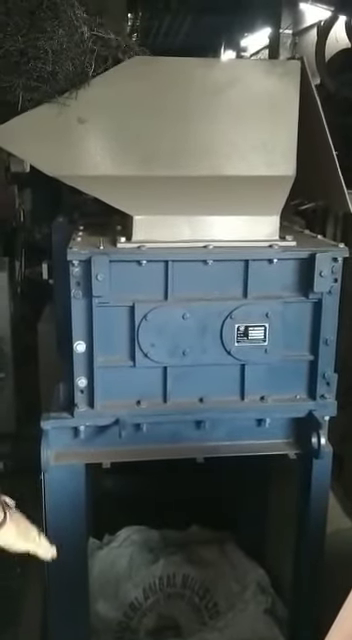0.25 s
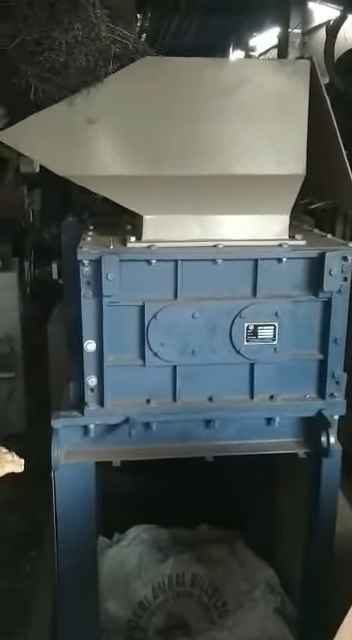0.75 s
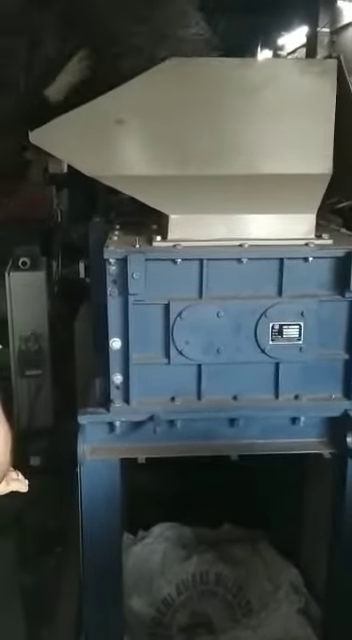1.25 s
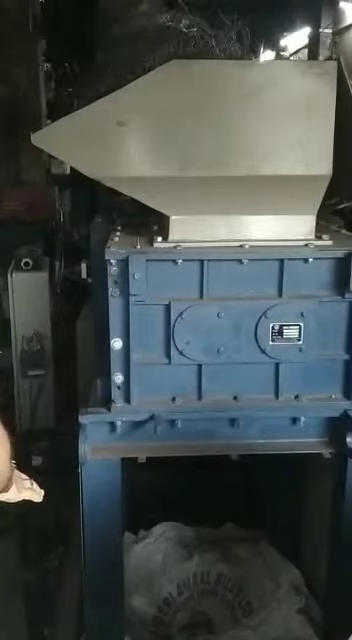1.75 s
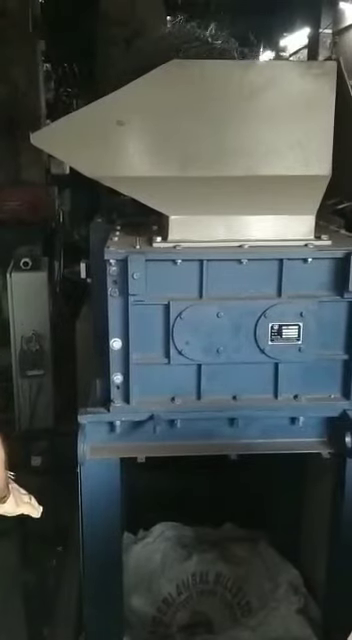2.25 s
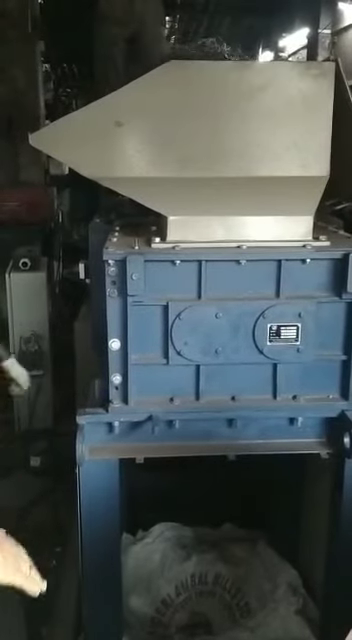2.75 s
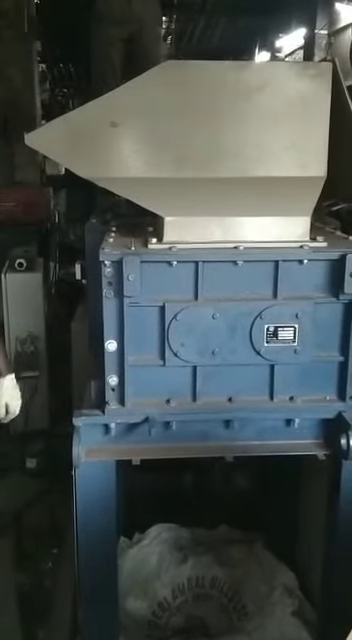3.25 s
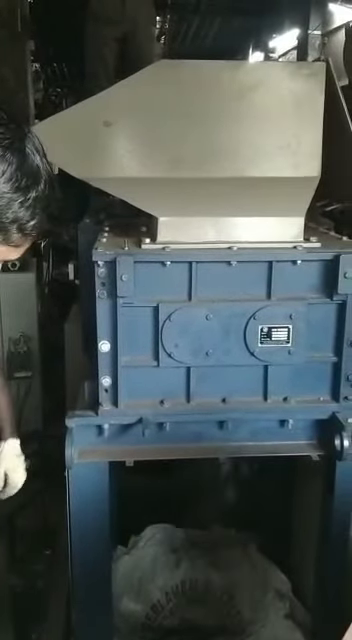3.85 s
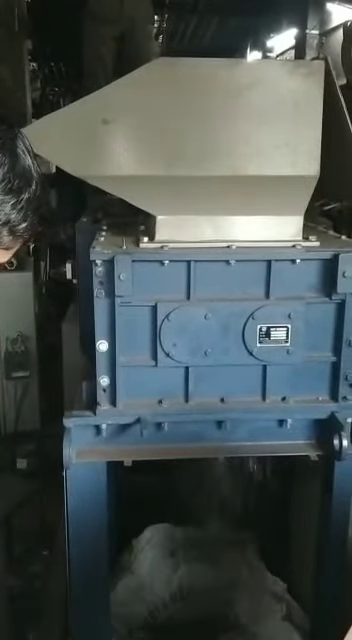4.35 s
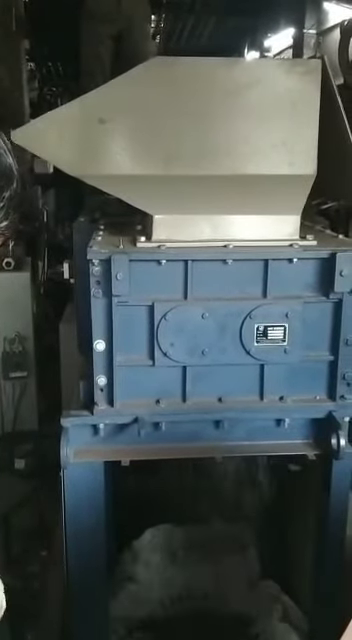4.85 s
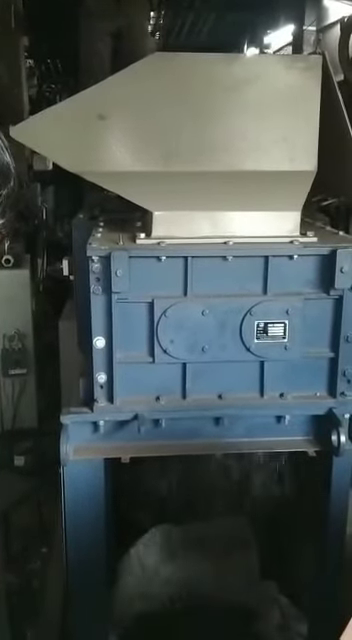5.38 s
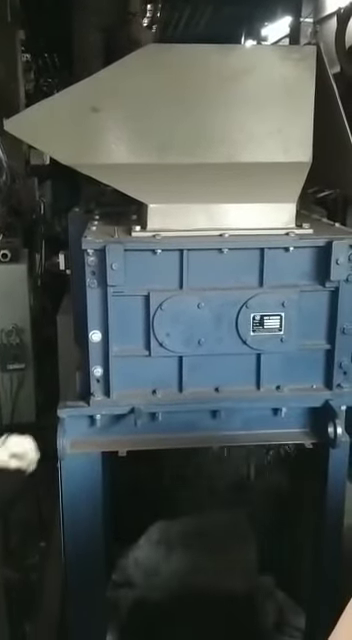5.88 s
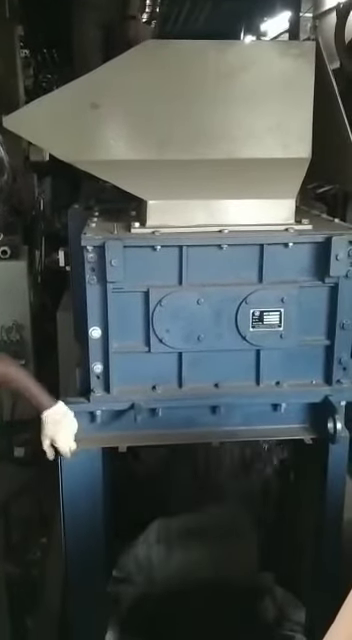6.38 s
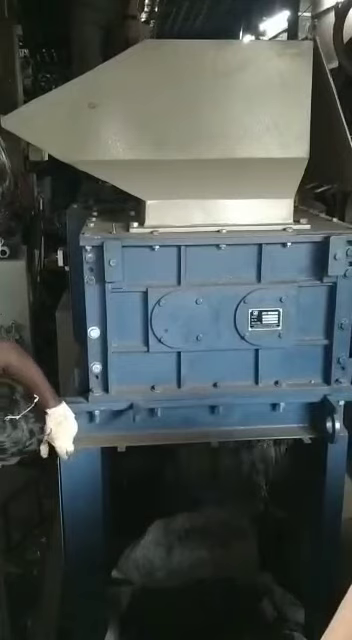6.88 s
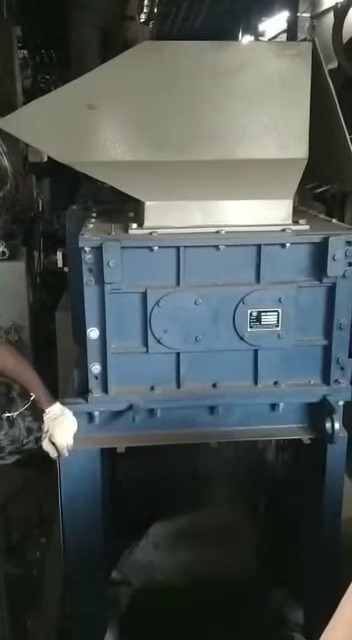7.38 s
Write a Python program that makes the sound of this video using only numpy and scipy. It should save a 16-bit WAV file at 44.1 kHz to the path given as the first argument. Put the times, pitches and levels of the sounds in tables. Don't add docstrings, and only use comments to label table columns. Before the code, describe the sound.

Close steady grinding and droning of a shredding machine, metal scraps rustling and knocking, while further off metal scrapes, clanks twice and squeals.

```python
import sys
import numpy as np
from scipy import signal
from scipy.io import wavfile
from scipy.ndimage import uniform_filter1d

SR = 44100
rng = np.random.default_rng(int(sys.argv[2]) if len(sys.argv) > 2 else 0)


def int16_out(signal):
    q = np.round(np.clip(np.atleast_2d(signal).T, -1, 1) * 32767)
    wavfile.write(sys.argv[1], SR, q.astype(np.int16))


def natural_amplitude(level_db):
    exponent = np.asarray(level_db, float) / 20
    return 10 ** exponent


N = 336042
T = np.arange(N) / SR


def evened(x):
    return x / np.sqrt(np.mean(x ** 2) + 1e-20)


def read(points, hz):
    f, value = np.transpose(points)
    return np.interp(np.log(hz + 1), np.log(f + 1), value)


def column(rows, index):
    rows = np.array(rows)
    return natural_amplitude(np.interp(T, rows[:, 0], rows[:, index]))


def resonate(x, hz, width, steady=0.):
    turn = np.exp(2j * np.pi * np.cumsum(hz * np.ones(len(x))) / SR)
    r = np.exp(-np.pi * width / SR)
    slow = signal.lfilter([1], [1, -2 * r, r * r], x / turn)
    return (turn * slow / (abs(slow) + 1e-9) ** steady).real


def wander(per_s):
    hz = np.geomspace(per_s / 6, per_s, 16)[:, None]
    phase = hz * T[::256] + rng.random((16, 1))
    coarse = np.sin(2 * np.pi * phase).sum(0)
    return evened(np.interp(T, T[::256], coarse))


def chatter(colour, per_s, spread_db, patchy_db, flicker_db):
    size = natural_amplitude(spread_db * np.minimum(rng.exponential(1, N), 4))
    contacts = size * rng.standard_normal(N) * (rng.random(N) < per_s / SR)
    hz, t, z = signal.stft(contacts, SR, nperseg=1024, noverlap=768)
    patches = rng.standard_normal((len(t), len(hz))).T
    patches = uniform_filter1d(patches, size=10, axis=0)
    patches = evened(uniform_filter1d(patches, size=24, axis=1))
    gain_db = read(colour, hz)[:, None] + patchy_db * patches
    sound = signal.istft(z * natural_amplitude(gain_db), SR, nperseg=1024, noverlap=768)[1][:N]
    return evened(sound * natural_amplitude(flicker_db * wander(14.)))


def spell(t, start, end, soft):
    return np.clip(np.minimum(t - start, end - t) / soft + .5, 0, 1) ** 1.5


def whistles(rows, soft, steady):
    rub, out = rng.standard_normal(N), np.zeros(N)
    for first, last, width, start, end, db in rows:
        early = max(round((start - soft - .1) * SR), 0)
        span = slice(early, round((end + soft) * SR))
        hz = np.interp(T[span], [start, end], [first, last])
        tone = resonate(rub[span], hz, width, steady)
        out[span] += natural_amplitude(db) * spell(T[span], start, end, soft) * evened(tone)
    return out


def struck(t, hz, level_db, rise_s):
    return np.sqrt(2) * natural_amplitude(level_db) * (1 - np.exp(-t / rise_s)) * np.sin(2 * np.pi * hz * t)


# (time [s], load [dB])
CUTTER_LOAD = [(0, -4), (.4, -0.5), (1.1, -1.5), (1.8, -0.5), (2.2, -3), (2.8, -2), (3.3, 0.5), (4.3, 1.5),
               (5.2, 0.5), (6.0, 1.5), (6.6, .5), (7.1, 1.5), (7.62, 0)]


def load():
    return column(CUTTER_LOAD, index=1)


# (time [s], rumble rise [dB])
SHAFT_STRAINS = [(.1, 0), (1.35, 2), (1.95, 1), (2.2, 1.5), (3.0, 2.5), (3.75, -0.5), (4.75, 0.5),
                 (5.45, 1.5), (6.2, 0.5), (6.7, 2), (7.45, 3)]


def surges():
    t, hump_s = T[::64], 0.15
    up_db = sum(db * np.exp(-((t - s) / hump_s) ** 2) for s, db in SHAFT_STRAINS)
    return natural_amplitude(np.interp(T, t, up_db))


def throb(tops):
    t = T[::64]
    rise, fall, rest_db = 54, 54, -47.5
    swells = [db - np.maximum((s - t) * rise, (t - s) * fall) for s, db in tops]
    return natural_amplitude(np.interp(T, t, np.maximum(np.max(swells, axis=0), rest_db)))


# (time [s], grinding rise [dB], rustle rise [dB], gear whirr rise [dB])
WAD_BITES = [(.57, 0.5, -1, 0.5), (1.21, 1.5, 1.5, 2.5), (1.38, 0.5, 2, 1), (1.52, 1.5, 3.5, 0),
             (1.6, 0, -0.5, 1.5), (1.72, 2.5, 5, -0.5), (1.99, 0, 0, 1), (2.78, 0, -1.5, 1),
             (3.22, 1.5, 0.2, -1.5), (3.36, 0, -1, 0.5), (3.5, 0, -0.5, 1.5), (4.16, -1.5, 0.5, 2.5),
             (4.5, -1, 0.5, -0.5), (4.68, -1.5, 1.5, -0.5), (5.26, 0.5, 1, 0.5), (5.62, 1, 0, -0.5),
             (5.8, 1.5, -1, -2), (6.05, 0, -0.5, 0.5), (6.9, 1, 0.5, -0.5), (7.1, -0.5, 1, -1.5)]


def bites(index):
    t, rise_s, fall_s = T[::64], 0.042, 0.077
    up_db = 0
    for row in WAD_BITES:
        hump_s = np.where(t < row[0], rise_s, fall_s)
        up_db = up_db + row[index] * np.exp(-((t - row[0]) / hump_s) ** 2)
    return natural_amplitude(np.interp(T, t, up_db))


# (frequency [Hz], level [dB per Hz])
DRONE_COLOUR = [(20, -37), (40, -43), (65, -38.5), (95, 1), (230, -10), (280, -1), (400, 1), (560, -10),
                (900, -54)]
# (frequency [Hz], level [dB per Hz])
WHIRR_COLOUR = [(300, -32), (550, 1), (800, 2), (1000, 2), (1250, -2), (2000, -44)]
# (frequency [Hz], width [Hz], rms against the drone [dB])
HOUSING_PANELS = [(126.4, 7.1, -18.5), (141.4, 10.5, -15), (155.5, 10.6, -18.5), (191.2, 17, -14.5),
                  (217.2, 6.1, -16.5), (267.3, 9.8, -10.5), (307.3, 12, -7.5), (349.3, 22.5, -9.5),
                  (420.8, 24, -14), (485.7, 18, -12.5), (527, 23, -19)]
# (frequency [Hz], width [Hz])
LOUD_PANELS = [(289, 9.5), (323, 11.5)]
# (time [s], rms at the top [dB])
PANEL_THROBS = [
    [(.57, -38.5), (1.21, -35), (1.62, -35), (1.95, -37), (2.2, -35.5), (2.46, -35), (2.9, -47),
     (3.76, -41.5), (4.16, -39), (4.72, -35), (5.26, -42), (5.52, -34.5), (5.84, -35), (6.64, -37),
     (7.0, -36.5), (7.24, -41)],
    [(.68, -42), (1.15, -44), (1.35, -36), (1.59, -36), (2.0, -48), (2.8, -48), (3.8, -49), (4.27, -41.5),
     (5.5, -47), (5.95, -37), (6.64, -49), (6.98, -38.5), (7.6, -40)],
]


def housing():
    shake, work = rng.standard_normal(N), load()
    panels = np.zeros(N)
    for hz, width, db in HOUSING_PANELS:
        panels += natural_amplitude(db + 1.24 * wander(1.474)) * evened(resonate(shake, hz, width))
    drone = chatter(DRONE_COLOUR, 20000., spread_db=0.5, patchy_db=-1.0, flicker_db=1.0)
    rumble = surges() * evened(natural_amplitude(-3.5) * drone + panels)
    strong = np.zeros(N)
    for tops, (hz, width) in zip(PANEL_THROBS, LOUD_PANELS):
        strong += throb(tops) * evened(resonate(shake, hz, width, steady=0.55))
    whirr = chatter(WHIRR_COLOUR, 20000., spread_db=0.9, patchy_db=.6, flicker_db=0.2)
    whirr = bites(index=3) * whirr
    return natural_amplitude(-36.5) * work ** 0.092 * rumble + strong + natural_amplitude(-39) * work ** 0.21 * whirr


# (time [s], frequency [Hz], rms [dB])
MESH_WHINE = [(0, 986, -47), (.4, 986, -47.5), (.95, 1008, -47.5), (1.08, 990, -51), (1.2, 950, -58),
              (1.35, 922, -50), (1.8, 920, -51), (2.3, 915, -60), (4.8, 920, -66), (5.3, 925, -54),
              (5.8, 938, -62), (6.1, 950, -50), (6.6, 962, -50), (6.75, 975, -54), (7.0, 988, -48),
              (7.62, 1004, -47)]


def mesh():
    s, hz, _ = np.transpose(MESH_WHINE)
    whine = resonate(rng.standard_normal(N), np.interp(T, s, hz), 6., steady=.75)
    return column(MESH_WHINE, index=2) * evened(whine)


# (time [s], rms [dB])
MOTOR_HUM = [(0.0, -45), (0.2, -55), (0.42, -45), (0.7, -64), (0.88, -46.5), (1.4, -51.5), (2.0, -54),
             (2.4, -48), (2.9, -58), (3.65, -49.5), (3.9, -49), (4.37, -40.5), (5.26, -45), (5.69, -41.5),
             (6.11, -45), (6.9, -40.5), (7.45, -50), (7.62, -40)]
# (first frequency [Hz], last frequency [Hz], start [s], end [s], rms [dB])
BEARING_WHINES = [(920, 920, -.2, 1.1, -53), (190, 190, -.2, 1.7, -49), (2090, 2090, -.2, 1.3, -52),
                  (8450, 8450, -.2, 1.2, -57), (8450, 8450, 1.3, 2.1, -60), (1480, 1480, 3.9, 5.3, -50),
                  (1600, 1600, 3.7, 5.5, -50), (8450, 8450, 5.2, 6, -58), (8450, 8450, 6.1, 6.9, -61),
                  (8450, 8450, 7, 7.7, -58)]


def motor():
    hum_hz = 99.4
    hum = np.sqrt(2) * np.sin(2 * np.pi * hum_hz * T + 0.51 * wander(2.2))
    whines = []
    for first, last, *rest in BEARING_WHINES:
        width = min(0.019 * first, 25)
        whines.append((first, last, width, *rest))
    return column(MOTOR_HUM, index=1) * hum + mesh() + whistles(whines, .15, steady=.6)


# (frequency [Hz], level [dB per Hz])
GRIND_COLOUR = [(800, -25), (1250, -4.5), (1550, 0), (2200, 0), (3000, -3), (3300, -8.5), (5000, -45)]
# (frequency [Hz], level [dB per Hz])
RUSTLE_COLOUR = [(2000, -22), (3200, 0), (4500, -0.5), (5500, -2), (6400, -0.5), (7000, 1.5), (7700, -1),
                 (8300, -10), (9000, -18), (9650, -25), (10600, -31.5)]
# (time [s], stir [dB])
HOPPER_STIR = [(0, -1), (.15, 2.5), (.35, -2), (.68, 0.5), (1.2, -2.5), (1.85, -1.5), (2.2, -4.5),
               (2.8, -1.5), (3.3, 0.5), (4.3, -1), (4.8, -1), (5.3, 0.5), (5.9, 2.5), (6.42, 2),
               (6.6, -0.5), (7.62, 1)]
# (frequency [Hz], width [Hz], start [s],
# end [s], rms [dB])
WALL_BRUSHES = [
    (6980, 1800, 1.65, 1.786, -36),
    (5180, 570, 0.4, 1.19, -45.5),
    (7460, 340, 1.3, 1.55, -42.5),
    (2220, 1400, 3.24, 3.45, -40),
    (1520, 410, 2.6, 5.6, -43.5),
    (1430, 1800, 1.2, 1.6, -44),
    (6300, 460, 3.3, 4.3, -50),
    (4920, 720, 6.8, 7.5, -45.5),
    (632, 60, 1.51, 2.3, -46.5),
    (715, 70, 2.6, 3.15, -47),
]


def cutters():
    grind = chatter(GRIND_COLOUR, 20000., spread_db=.6, patchy_db=.5, flicker_db=.2)
    rustle = chatter(RUSTLE_COLOUR, 30000., spread_db=.7, patchy_db=.9, flicker_db=.55)
    brushes = whistles([(hz, hz, *rest) for hz, *rest in WALL_BRUSHES], .05, steady=0)
    grind = natural_amplitude(-34) * load() * bites(index=1) * grind
    rustle = natural_amplitude(-34) * column(HOPPER_STIR, index=1) * bites(index=2) * rustle
    return grind + rustle + brushes


# (frequency [Hz], width [Hz], rms [dB])
SHEET_MODES = [(2035, 60, -43), (2220, 40, -47), (2710, 110, -44), (2960, 40, -48), (3900, 130, -43),
               (4100, 180, -43.5), (4710, 60, -49), (5795, 200, -46), (6560, 220, -43), (7130, 60, -48),
               (8000, 220, -46)]
# (time [s], pressure [dB])
SHEET_SCRAPE = [
    (0, -1),
    (.1, -3),
    (.2, -3),
    (.27, 3),
    (.295, -3),
    (.34, -24),
]
# (frequency [Hz], start [s], end [s], rms [dB])
SHEET_CRIES = [(5800, .11, .23, -39.5), (5800, .23, .29, -44), (3950, .04, .22, -42), (4060, .07, .13, -42),
               (4060, .17, .22, -42), (4010, .235, .265, -38.5), (2740, .17, .22, -39),
               (2500, .03, .1, -44), (2500, .24, .29, -42), (2710, .02, .12, -41.5), (1850, .02, .12, -43),
               (1850, .24, .33, -43), (2710, .25, .31, -42), (2040, .08, .16, -42), (2040, .18, .28, -43),
               (2220, .25, .29, -38.5), (6560, .03, .08, -42), (6560, .15, .2, -43), (6700, .24, .27, -41),
               (7300, .21, .24, -44)]


def sheet():
    rub, body = rng.standard_normal(N), np.zeros(N)
    for hz, width, db in SHEET_MODES:
        body += natural_amplitude(db) * evened(resonate(rub, hz, width))
    cries = whistles([(hz, hz, 120, *rest) for hz, *rest in SHEET_CRIES], .03, steady=.55)
    return cries + column(SHEET_SCRAPE, index=1) * body


# (time [s], frequency [Hz], t60 [s], rms [dB])
WALL_KNOCKS = [
    (.74, 1550, .25, -35),
    (1.195, 1416, .3, -36.5),
    (1.31, 418, 0.77, -37),
    (1.55, 415, .5, -36),
    (1.57, 1743, 0.34, -35),
    (1.7, 2500, .3, -41),
    (1.705, 1440, .22, -34),
    (1.82, 423, .6, -36.5),
]


def knocks():
    out = np.zeros(N)
    for s, hz, t60, db in WALL_KNOCKS:
        t = np.maximum(T - s, 0)
        out += struck(t, hz, db - 60 * t / t60, rise_s=.004)
    return out


# (frequency [Hz], start [s], end [s], rms
# [dB])
BAR_SQUEALS = [(5805, 6.12, 6.23, -44), (5798, 6.24, 6.31, -39), (5790, 6.31, 6.38, -40),
               (5778, 6.375, 6.445, -35), (5772, 6.455, 6.5, -37.5), (5772, 6.5, 6.53, -45),
               (6070, 5.93, 6.03, -44), (6070, 6.13, 6.21, -43), (6070, 6.23, 6.3, -41),
               (6070, 6.31, 6.42, -46), (3050, 6.29, 6.33, -41), (4220, 6.14, 6.21, -39),
               (4220, 6.295, 6.385, -38), (4220, 6.42, 6.52, -39.5), (3170, 6.17, 6.27, -44),
               (3165, 6.36, 6.41, -41.5), (2100, 6.41, 6.48, -36.5), (2100, 6.49, 6.54, -42),
               (2100, 6.35, 6.38, -41), (2240, 6.25, 6.4, -43), (2240, 6.41, 6.54, -42),
               (7250, 6.26, 6.39, -39.5), (3160, 3.33, 3.4, -40.5), (4220, 4.75, 4.81, -42),
               (1840, 3.34, 3.43, -39.5), (3162, 4.765, 4.81, -41), (3162, 4.81, 4.89, -43.5),
               (1478, 4.56, 4.73, -41), (3162, 4.57, 4.61, -44), (7346, 4.455, 4.49, -42),
               (4280, 4.67, 4.7, -46), (5424, 4.66, 4.678, -45), (2684, 4.57, 4.61, -44),
               (3165, 6.1, 6.17, -46), (3165, 6.26, 6.32, -45), (6070, 6.42, 6.48, -47)]
# (frequency [Hz], start [s], end [s], rms [dB])
BAR_SLIDES = [
    (3760, 6.19, 6.25, -41),
    (6750, 6.17, 6.33, -42),
    (6800, 6.41, 6.48, -42),
    (7400, 6.4, 6.48, -42),
    (3840, 6.43, 6.49, -40),
    (6650, 5.97, 6.5, -43),
    (8040, 6.2, 6.5, -45),
    (4720, 5.6, 6.42, -50),
]


def dragging():
    sag = .0006
    rows = [(hz * (1 + sag), hz * (1 - sag), 11, *rest) for hz, *rest in BAR_SQUEALS]
    rows += [(hz, hz, 70, *rest) for hz, *rest in BAR_SLIDES]
    return whistles(rows, .045, steady=.85)


# (frequency [Hz], t60 [s], first clank [dB], second clank [dB])
BAR_MODES = [(1478, 2.5, -40, -44), (1841, .35, -33, -50), (2035, .3, -37, -50), (2248, .3, -32.5, -42),
             (2684, 1.2, -33.5, -30.5), (3162, 2.5, -34, -38), (3672, .45, -28, -44), (4220, .6, -31, -52),
             (4350, .3, -42, -60), (4800, .4, -41, -54), (5424, .5, -37, -35), (5790, .25, -40, -44),
             (6072, .3, -39, -42), (6590, .6, -34.5, -46), (6747, .35, -52, -35), (7010, .3, -45, -56),
             (7346, .12, -33, -48), (7438, .12, -40, -50), (8107, .3, -45, -52)]
# (time [s], time until the bar lies down [s], muffling [dB per s])
BAR_CLANKS = [
    (4.474, .08, 240),
    (4.674, .08, 420),
]
# (frequency [Hz], level [dB per Hz])
CRASH_COLOUR = [(1500, -14), (2500, -2), (5000, 3), (6800, -2), (8200, -4), (9500, -31)]


def bar():
    out = dragging()
    clatter = chatter(CRASH_COLOUR, 4000., spread_db=7.0, patchy_db=1.5, flicker_db=0.0)
    for s, *_ in BAR_CLANKS:
        t = np.maximum(T - s, 0)
        out += natural_amplitude(-38.5 - 60 * t / .3) * (1 - np.exp(-t / .004)) * clatter
    for hz, t60, *blows_db in BAR_MODES:
        for (s, free_s, muffling), db in zip(BAR_CLANKS, blows_db):
            t = np.maximum(T - s, 0)
            rattle_db = 1.5 * wander(30.)
            muffle_db = -muffling * np.maximum(t - free_s, 0)
            out += struck(t, hz, db - 60 * t / t60 + muffle_db + rattle_db, rise_s=.015)
    return out


# (frequency [Hz], t60 [s])
SHOP_ECHO = [(500, .8), (2000, 0.89), (5000, 0.73), (9000, 0.21)]


def shop(x):
    taps = np.zeros(SR)
    at = np.arange(200, SR - 20, 20)
    taps[at + rng.integers(0, 20, len(at))] = rng.choice([-1., 1.], len(at))
    hz, t, z = signal.stft(taps, SR, nperseg=256)
    decay_db = -60 * t / read(SHOP_ECHO, hz)[:, None]
    tail = signal.istft(z * natural_amplitude(decay_db), SR, nperseg=256)[1]
    return signal.fftconvolve(x, tail / np.linalg.norm(tail))[:N]


def scene():
    near = housing() + motor() + cutters() + knocks()
    far = sheet() + bar()
    return (near + far + natural_amplitude(-23) * shop(far))[None]


def low_pass(x):
    return signal.sosfilt(signal.butter(12, 16000, fs=SR, output="sos"), x)


def record(dry):
    band = signal.firwin(1023, 10600, window=("kaiser", 12), fs=SR)
    heard = signal.oaconvolve(dry, band[None], "same")
    click_s, jump, heal_s = 1.56803, -.06, .0006
    click = jump * (T >= click_s) * np.exp(-np.maximum(T - click_s, 0) / heal_s)
    return low_pass(heard + click)


dry = scene()
out = record(dry)
int16_out(out)
```